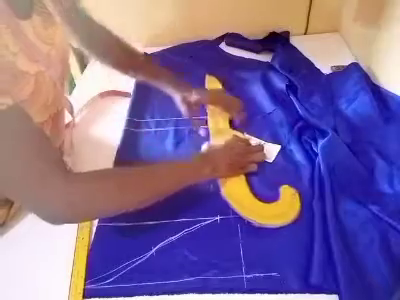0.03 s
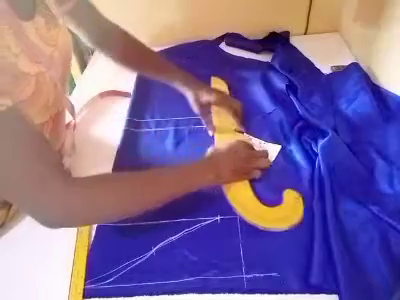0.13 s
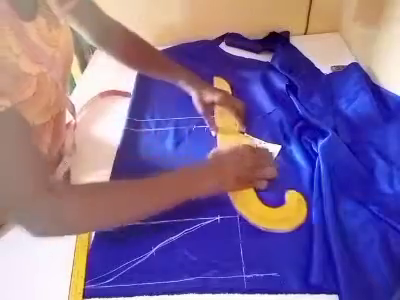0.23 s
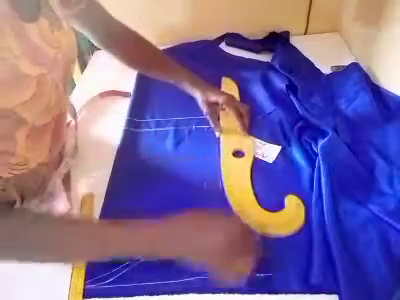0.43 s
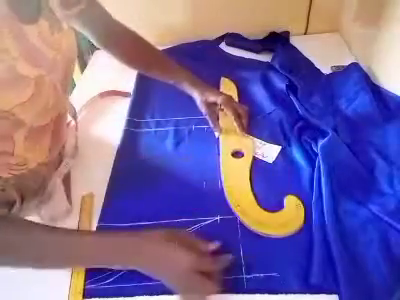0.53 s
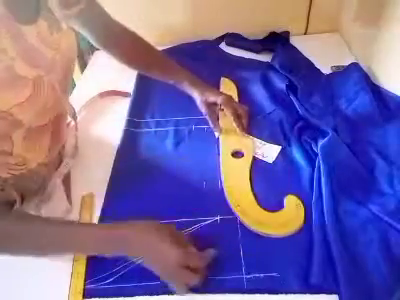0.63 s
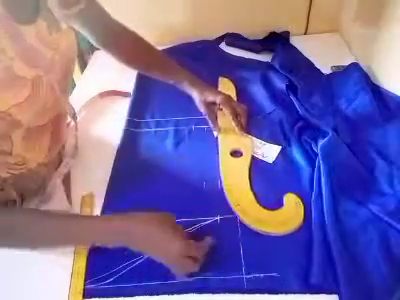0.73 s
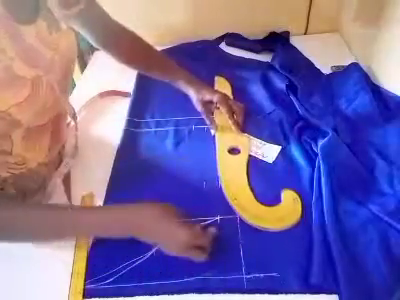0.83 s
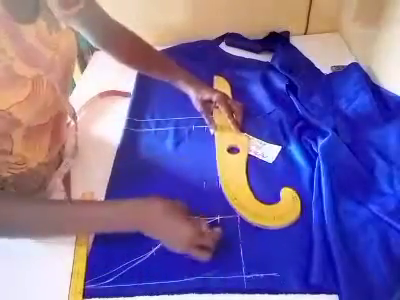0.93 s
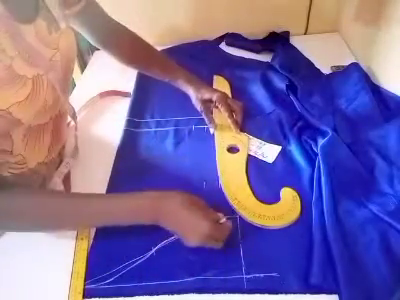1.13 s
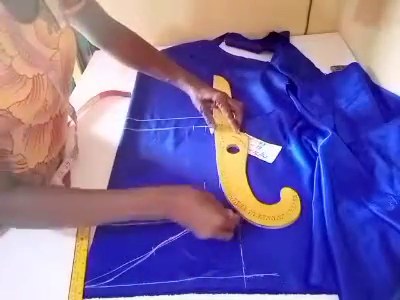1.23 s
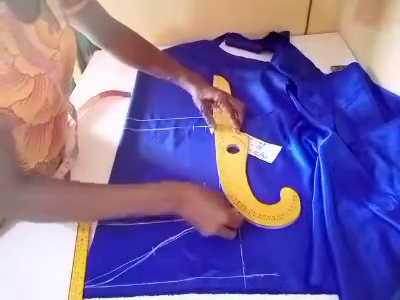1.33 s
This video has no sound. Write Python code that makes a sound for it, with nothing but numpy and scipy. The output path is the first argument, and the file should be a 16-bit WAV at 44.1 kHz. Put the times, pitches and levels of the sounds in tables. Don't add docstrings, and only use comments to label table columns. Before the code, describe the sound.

Soft cloth rubbing leads to a low, padded knock of a plastic ruler on a table, followed by light squeaky sliding, rustles and a crisp brush with ticks; close small microphone, quiet indoor room, distant fan.

```python
import sys
import numpy as np
from scipy import signal
from scipy.io import wavfile
from scipy.ndimage import uniform_filter1d

SR = 44100
rng = np.random.default_rng(int(sys.argv[2]) if len(sys.argv) > 2 else 0)


def int16_out(signal):
    q = np.round(np.clip(np.atleast_2d(signal).T, -1, 1) * 32767)
    wavfile.write(sys.argv[1], SR, q.astype(np.int16))


def volts_from_decibels(level):
    exponent = np.asarray(level, float) / 20
    return 10 ** exponent


N = 61739
TIME_S = np.arange(N) / SR


def rms_one(x):
    return x / np.sqrt(np.mean(x ** 2) + 1e-20)


def at_hz(points, hz):
    table_hz, table_db = np.transpose(points)
    return np.interp(np.log(hz), np.log(table_hz), table_db)


def drift(rate_hz):
    r = np.exp(-80 * np.pi * rate_hz / SR)
    noise = rng.standard_normal(N // 40 + 2002)
    slow = signal.lfilter([1], [1, -2 * r, r * r], noise)[2000:]
    return np.interp(np.arange(N) / 40, np.arange(len(slow)), rms_one(slow))


def swell(peak_s, rise_s, fall_s):
    t = TIME_S - peak_s
    rise_db = 20 * t / max(rise_s, 1e-4)
    fall_db = -20 * t / max(fall_s, 1e-4)
    return volts_from_decibels(np.where(t < 0, rise_db, fall_db))


def swells(events):
    return sum(volts_from_decibels(level_db) * swell(peak_s, rise_s, fall_s) for peak_s, rise_s, fall_s, level_db in events)


def resonate(x, hz, width_hz):
    r = np.exp(-np.pi * width_hz / SR)
    zeros = np.array([1, 0, -1]) * (1 - r * r) / 2
    return signal.lfilter(zeros, [1, -2 * r * np.cos(2 * np.pi * hz / SR), r * r], x)


def bandpass(x, order, low_hz, high_hz):
    return signal.sosfilt(signal.butter(order, [low_hz, high_hz], "band", fs=SR, output="sos"), x)


def banded(sources, spectrum, patchy_db, envelope):
    edges_hz = 30 * 2 ** np.arange(0, 9.3, 1 / 3)
    centres_hz = np.sqrt(edges_hz[1:] * edges_hz[:-1])
    levels = volts_from_decibels(at_hz(spectrum, centres_hz))
    norm = np.sqrt(np.sum(levels ** 2 * np.diff(edges_hz)) * 2 / SR)
    out = np.zeros(N)
    for k, hz in enumerate(centres_hz):
        band = bandpass(sources[k % 2], 2, edges_hz[k], edges_hz[k + 1])
        flicker = volts_from_decibels(patchy_db * drift(18.7))
        out += band * levels[k] / norm * flicker * envelope(hz)
    return out


def grit():
    fibres_per_s, spread_db = 8000, 2.5
    sizes = volts_from_decibels(spread_db * np.minimum(rng.exponential(1, (2, N)), 5))
    signs = rng.choice([-1, 1], (2, N))
    return rms_one(sizes * signs * (rng.random((2, N)) < fibres_per_s / SR))


# hz [Hz], density_db [dB per Hz]
AIR_SPECTRUM = [(40, -2), (120, -22), (320, -6), (480, -20.5), (1300, -20), (3000, -25.5), (6500, -25),
                (12000, -55)]
# pitch_hz [Hz], width_hz [Hz], level_db [dB]
FAN_HUM = [
    (101.2, 18, -59.5),
    (141, 28, -57.5),
    (184.8, 10.7, -66),
]
# time_s [s], level_db [dB]
BLADE_LEVEL = [(0.0, -52.5), (0.22, -67), (0.24, -54), (0.432, -66.5), (0.454, -57.5), (0.598, -58.5),
               (0.626, -77), (0.762, -55.5), (0.848, -67), (1.042, -65), (1.062, -56), (1.23, -67),
               (1.312, -58), (1.4, -63)]


def room_tone():
    hum = 0
    for pitch_hz, width_hz, level_db in FAN_HUM:
        tone = resonate(rng.standard_normal(N + SR), pitch_hz, width_hz)
        tone = resonate(tone, pitch_hz, 1.47 * width_hz)[SR:]
        hum = hum + volts_from_decibels(level_db) * rms_one(tone)
    blade_hz, blade_width_hz = 311.7, 7.02
    phase = 2 * np.pi * np.cumsum(blade_hz + blade_width_hz * drift(12.9)) / SR
    blade_db = 3.3 * drift(24) + np.interp(TIME_S, *np.transpose(BLADE_LEVEL))
    blade = np.sqrt(2) * np.sin(phase) * volts_from_decibels(blade_db)
    air = volts_from_decibels(-63) * banded(rng.standard_normal((2, N)), AIR_SPECTRUM, 4.6, lambda hz: 1)
    return hum + blade + air


# peak_s [s], rise_s [s], fall_s [s per 20 dB], level_db [dB]
FIRM_STROKES = [
    (0.554, 0.026, 0, -55.5),
    (0.747, 0.013, 0.06, -62),
    (0.834, 0.024, -0.02, -51),
    (.865, 0.058, -0.5, -58),
    (0.997, 0.012, -0.22, -51),
    (1.029, 0.036, -0.02, -51),
    (1.161, 0.034, 0.1, -69.5),
    (1.205, 0.014, 0.1, -58.5),
    (1.335, 0.026, 1.5, -60),
]


def presses():
    hz, width_hz = 1067, 380
    hum = resonate(resonate(grit()[0], hz, width_hz), hz, 2 * width_hz)
    return rms_one(hum) * swells(FIRM_STROKES)


# peak_s [s], rise_s [s], fall_s [s per 20 dB], level_db [dB]
FINGER_PATS = [
    (1.1838, .001, .012, -48),
    (1.192, .02, .03, -55),
    (1.2, .02, .016, -52),
    (1.23, .03, .06, -65),
    (0.83, .012, .07, -55),
    (0.36, .03, .03, -59),
]


def pats():
    dull = bandpass(grit()[0], 5, 810, 5140)
    return volts_from_decibels(-0.5) * rms_one(dull) * swells(FINGER_PATS)


# peak_s [s], rise_s [s], fall_s [s per 20 dB], level_db [dB], tilt_db [dB per octave]
CLOTH_STROKES = [(0.005, 0.051, .1, -53, 0), (0.03, 0.081, 0.05, -55, 2.5), (0.087, 0.049, 0.23, -56.5, 1),
                 (0.116, .04, 0, -59, -1.5), (0.151, 0.028, 0.07, -56, 2.5), (0.173, 0.038, 0, -52.5, 0.5),
                 (0.215, 0.075, -0.04, -53, 0.7), (0.241, 0.08, -0.12, -51, 1.5),
                 (0.261, 0.016, -0.0355, -48, 2), (0.273, 0.043, 0.02, -47, 2),
                 (0.294, 0.025, 0.4, -56.5, -4), (0.355, 0.012, 0.2, -54.5, 0),
                 (0.399, 0.038, -0.01, -53.5, 5.5), (0.424, 0.053, -0.42, -57, 5),
                 (0.5413, 0.0015, 0.009, -44, 4.5), (0.5506, 0.0041, .02, -44.5, 7),
                 (0.571, 0.035, 0.26, -55, 0.5), (0.599, 0.058, .05, -52, 5), (0.62, 0.044, 0.1, -52.5, -1),
                 (.65, 0.026, -0.09, -58.5, -2.5), (0.7, 0.02, 0.15, -55.5, 1),
                 (.733, 0.022, 0.086, -47.5, -0.5), (0.746, 0.043, 0.0342, -49, 3),
                 (0.761, 0.032, .03, -51.5, -3), (0.789, 0.056, 0.06, -60.5, -3),
                 (0.821, 0.018, 0.1, -51, -0.5), (0.831, 0.023, 0.11, -50.5, 3),
                 (0.85, 0.022, 0.07, -53, -1), (0.88, 0.045, 0.14, -59, -1.2),
                 (0.96, 0.18, 0.05, -59, 3.47), (0.9966, 0.02, 0.02, -40.5, 1.5),
                 (1.005, 0.0079, -0.0026, -40, -1), (1.007, 0.015, 0.0515, -36.5, -0.5),
                 (1.018, 0.037, 0.05, -40, 0), (1.034, 0.031, 0.06, -45, -2),
                 (1.063, 0.021, 0.1, -53.5, -2), (1.095, 0.066, -0.1, -58, 1),
                 (1.155, 0.024, -0.04, -64.5, 4), (1.28, 0.11, -0.4, -63, 2.5),
                 (1.337, 0.053, 0.07, -55.5, -1.5), (1.363, 0.066, 0.16, -58, -1),
                 (1.39, 0.082, -0.1, -58.5, 0.5)]
# hz [Hz], density_db [dB per Hz]
CLOTH_SPECTRUM = [(200, -16.5), (650, -7.5), (1000, -6.5), (2500, -2.5), (6800, -3.5), (9500, -12.5),
                  (12500, -17), (15500, -23.5)]
# pitch_hz [Hz], width_hz [Hz], level_db [dB]
RULER_MODES = [(1159, 16, -20.5), (1694, 38, -20), (1406, 7.1, -25), (2025, 22, -30), (3158, 26, -22.5),
               (3450, 17, -40), (4390, 44, -19.5), (4830, 28, -16.5), (5500, 20, -19), (6460, 37, -16),
               (6820, 26, -18), (7300, 75, -31), (8720, 28, -24)]


def cloth():
    fibres = grit()
    shapes = [volts_from_decibels(level_db) * swell(peak_s, rise_s, fall_s)
              for peak_s, rise_s, fall_s, level_db, _ in CLOTH_STROKES]
    powers = np.array(shapes) ** 2
    tilts_db = np.array(CLOTH_STROKES)[:, 4]

    def envelope(hz):
        return np.sqrt(volts_from_decibels(2 * tilts_db * np.log2(hz / 5000)) @ powers)

    sing = 0
    for pitch_hz, width_hz, level_db in RULER_MODES:
        tone = rms_one(resonate(fibres[0], pitch_hz, width_hz))
        sing = sing + volts_from_decibels(level_db + 2.9 * drift(4.0)) * envelope(pitch_hz) * tone
    return sing + banded(fibres, CLOTH_SPECTRUM, 1.2, envelope)


# start_s [s], peak_db [dB], low_hz [Hz], high_hz [Hz]
THREAD_SNAPS = [(.2396, -33, 1500, 4200), (.2408, -31, 1500, 4200), (.2443, -32, 1500, 3800),
                (.2625, -35, 2500, 9000), (.2725, -38, 2500, 10000), (0.5422, -38, 3000, 11000),
                (.55, -37, 3000, 13000), (.755, -39, 1500, 9000), (0.7615, -40, 1500, 9000),
                (0.9958, -31, 2500, 8000), (1.0033, -29, 3000, 15000), (1.0047, -29, 2500, 9000),
                (1.0064, -22, 2500, 15000), (1.0125, -29, 2000, 9000), (1.1832, -39, 1000, 5600)]


def snaps():
    out = np.zeros(N)
    for start_s, peak_db, low_hz, high_hz in THREAD_SNAPS:
        click = np.zeros(400)
        click[0] = 2 * volts_from_decibels(peak_db)
        i = int(start_s * SR)
        out[i:i + len(click)] += bandpass(click, 3, low_hz, high_hz)
    return out


# start_s [s], length_s [s], pitch_hz [Hz], width_hz [Hz], level_db [dB]
PLASTIC_SQUEAKS = [(0.201, 0.008, 3050, 90, -52), (0.214, 0.0088, 3090, 100, -54),
                   (0.224, 0.008, 3204, 121, -52), (0.235, 0.0029, 3000, 150, -55),
                   (0.471, 0.046, 2572, 55.5, -50.5), (0.485, 0.011, 2360, 78.6, -56),
                   (0.512, 0.023, 2865, 50, -49), (0.522, 0.026, 2532, 70.4, -57),
                   (0.55, 0.0072, 2860, 90, -62), (0.55, 0.027, 2820, 60, -60),
                   (0.572, 0.0072, 2830, 70, -52), (0.596, 0.038, 2565, 70, -54.5),
                   (0.599, 0.043, 2805, 70.5, -53), (0.658, 0.0075, 2826, 81, -49),
                   (0.667, .012, 3140, 90, -59), (0.685, 0.017, 2440, 200, -56),
                   (0.691, 0.018, 2880, 202, -51.5), (0.713, 0.0055, 3440, 100, -60)]


def squeaks():
    rise_s, fall_s, evenness = 0.008, 0.035, 0.65
    out = np.zeros(N)
    for start_s, length_s, pitch_hz, width_hz, level_db in PLASTIC_SQUEAKS:
        tone = resonate(rng.standard_normal(N), pitch_hz, width_hz)
        tone = resonate(tone, pitch_hz, 3 * width_hz)
        flutter = uniform_filter1d(np.abs(tone) + 1e-9, size=200)
        tone = rms_one(tone / flutter ** evenness)
        rise_db = 20 * (TIME_S - start_s) / rise_s
        fall_db = 20 * (start_s + length_s - TIME_S) / fall_s
        out += tone * volts_from_decibels(level_db + np.minimum(0, np.minimum(rise_db, fall_db)))
    return out


# centre_s [s], half_length_s [s], level_db [dB]
PALM_PUSHES = [
    (.225, 0.0014, -32),
    (.2337, 0.0017, -37),
]
# start_s [s], pitch_hz [Hz], peak_db [dB], t60_s [s]
TABLE_BOOMS = [
    (0.203, 88, -37, 0.16),
    (0.2283, 104, -51, 0.22),
    (0.2398, 110, -25.5, 0.13),
    (0.2491, 108.2, -38, 0.86),
    (0.2419, 196, -30.5, 0.13),
    (0.243, 148, -36, 0.11),
    (0.245, 80.2, -35.5, 0.3),
]


def booms():
    out = np.zeros(N)
    for centre_s, half_length_s, level_db in PALM_PUSHES:
        u = (TIME_S - centre_s) / half_length_s
        out += volts_from_decibels(level_db) * (1 - u ** 2) * np.exp(-u ** 2 / 2)
    rise_s = 0.003
    for start_s, pitch_hz, peak_db, t60_s in TABLE_BOOMS:
        t = np.maximum(TIME_S - start_s, 0)
        decay = volts_from_decibels(peak_db - 60 * t / t60_s)
        out += decay * np.sin(2 * np.pi * pitch_hz * t) * (1 - np.exp(-t / rise_s))
    return out


# [Hz, low-pass cut]
TABLE_KNOCKS = [
    (0.2409, -31, 4000),
    (0.2428, -27.5, 2940),
    (0.2465, -30, 1500),
    (0.2578, -38, 1500),
    (0.2715, -42, 2500),
    (0.278, -38, 2030),
    (0.296, -40, 1190),
    (0.318, -40, 2500),
    (0.342, -41.5, 700),
    (0.358, -43.5, 700),
]
# pitch_hz [Hz], level_db [dB], t60_s [s]
KNOCK_MODES = [(286, -15.5, 0.16), (417, -13, 0.11), (471, -7.5, 0.24), (530.4, -3.5, 0.062),
               (585, -5, 0.07), (3730, -13, 0.025), (721, -12, 0.086), (872, -9, 0.056), (1182, -18, 0.14),
               (1846, -11.5, 0.049), (2020, -10, 0.036), (2320, -4, 0.025), (2610, -10, 0.039),
               (3080, -31, 0.02)]
# hz [Hz], density_db [dB per Hz]
RATTLE_SPECTRUM = [(120, -32), (300, -8.5), (480, 0.5), (1000, -11.5), (2500, -12.5), (4000, -25),
                   (8000, -58)]


def knocks():
    spread_db, rise_cycles = 1, 0.13
    out = np.zeros(N)
    t = np.arange(SR // 2) / SR
    for start_s, knock_db, hardness_hz in TABLE_KNOCKS:
        rings = np.zeros(len(t))
        for pitch_hz, mode_db, t60_s in KNOCK_MODES:
            decay = volts_from_decibels(knock_db + mode_db + spread_db * rng.normal() - 60 * t / t60_s)
            rise = 1 - np.exp(-t * pitch_hz / rise_cycles)
            rings += decay * np.sin(2 * np.pi * pitch_hz * t) * rise
        i = int(start_s * SR)
        out[i:i + len(t)] += signal.lfilter(*signal.butter(2, hardness_hz, fs=SR), rings)
    palm_s, palm_db_per_s = 0.36, 500
    out *= volts_from_decibels(-palm_db_per_s * np.maximum(TIME_S - palm_s, 0))

    def tail(hz):
        return swell(0.242, 0.0024, 0.088 * (500 / hz) ** 0.067)

    return out + volts_from_decibels(-34) * banded(grit(), RATTLE_SPECTRUM, 2, tail)


def scene():
    background = room_tone()
    hands = presses() + pats() + cloth()
    ruler = snaps() + squeaks()
    table = booms() + knocks()
    return (background + hands + ruler + table)[None]


def roll_off(x):
    return signal.sosfilt(signal.butter(12, 17020, fs=SR, output="sos"), x)


def record(dry):
    x = signal.sosfilt(signal.butter(3, 47.4, "high", fs=SR, output="sos"), dry)
    x = x - 0.57 * resonate(x, hz=12600, width_hz=6200)
    x = x + volts_from_decibels(10) * resonate(x, hz=15200, width_hz=730)
    x = signal.sosfilt(signal.ellip(12, 1, 70, 15800, fs=SR, output="sos"), x)
    return roll_off(x)


dry = scene()
out = record(dry)
int16_out(out)
```